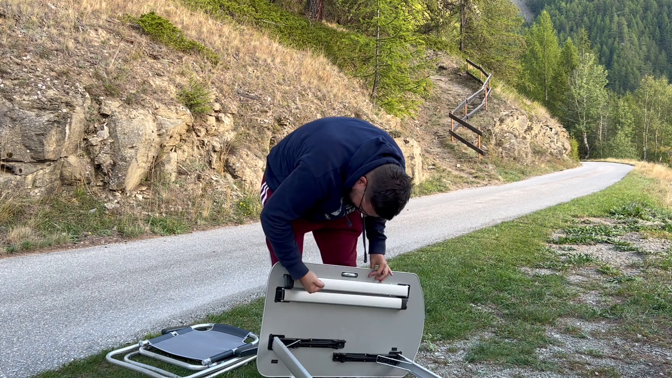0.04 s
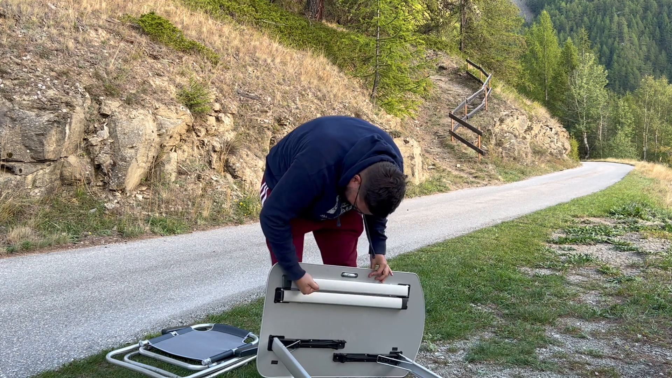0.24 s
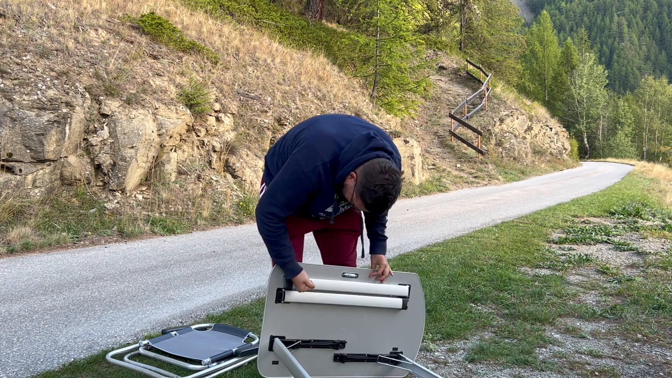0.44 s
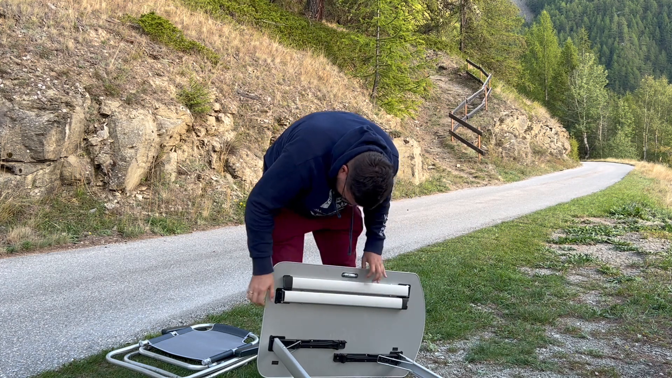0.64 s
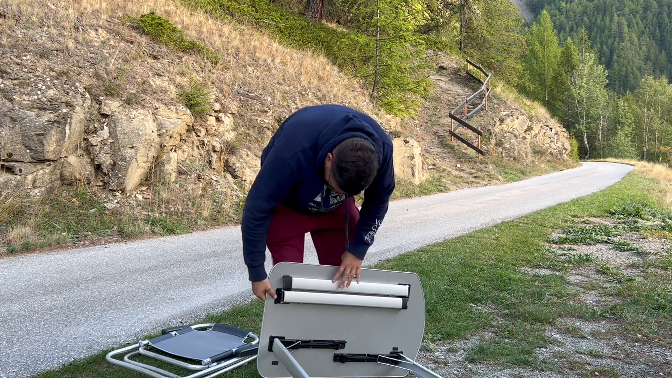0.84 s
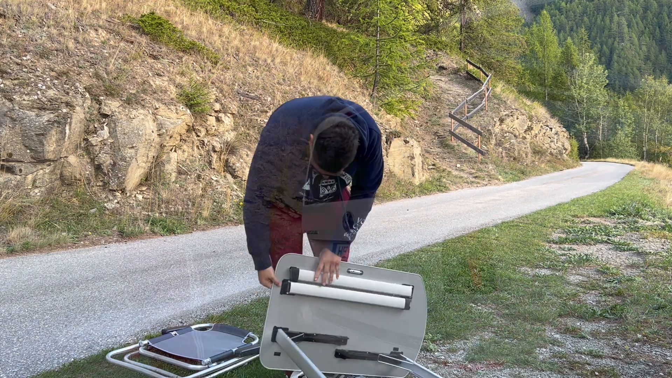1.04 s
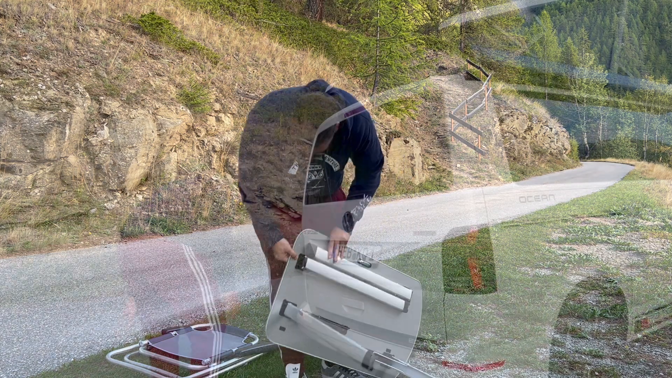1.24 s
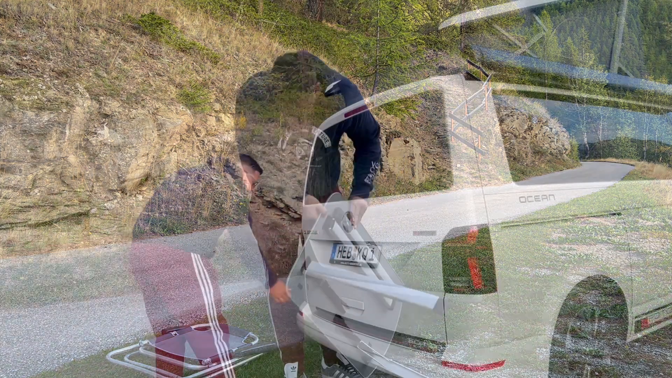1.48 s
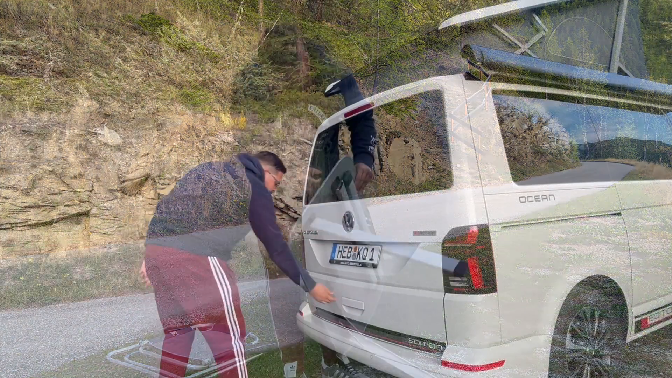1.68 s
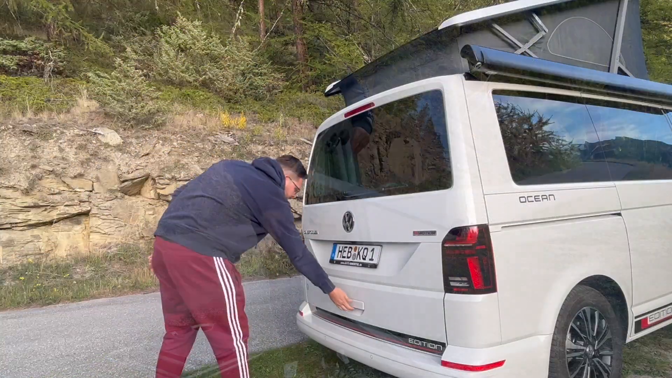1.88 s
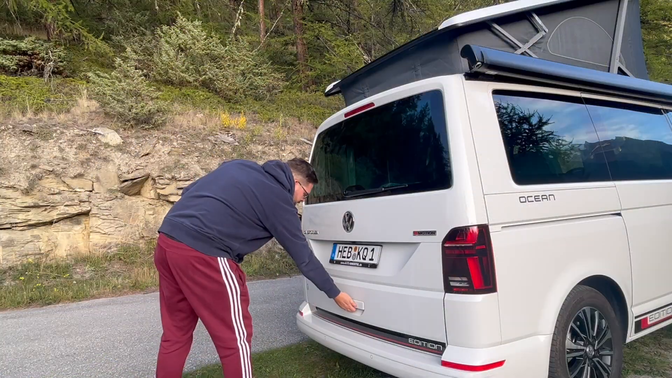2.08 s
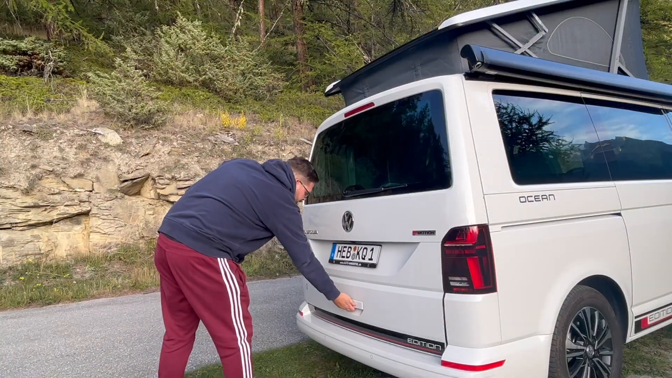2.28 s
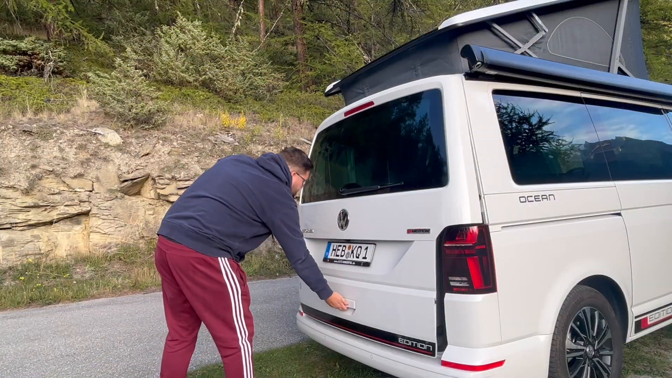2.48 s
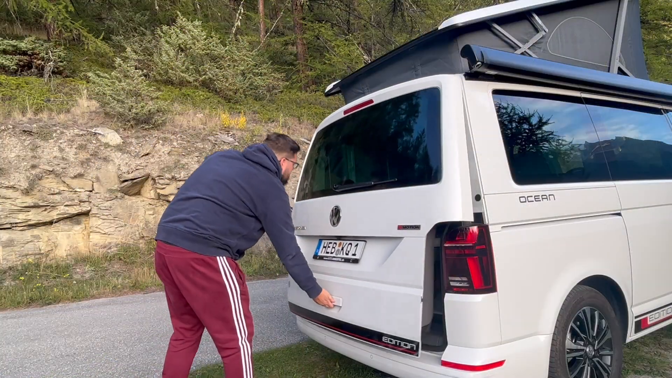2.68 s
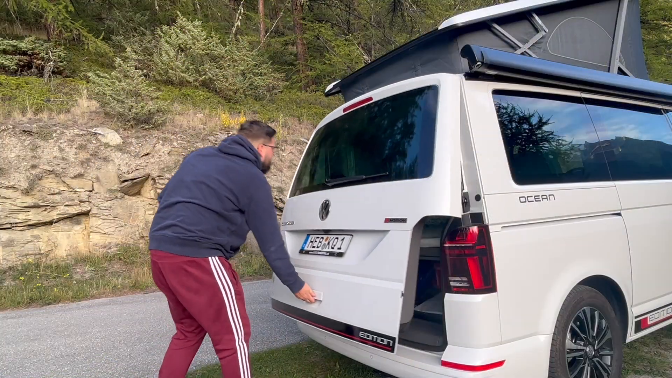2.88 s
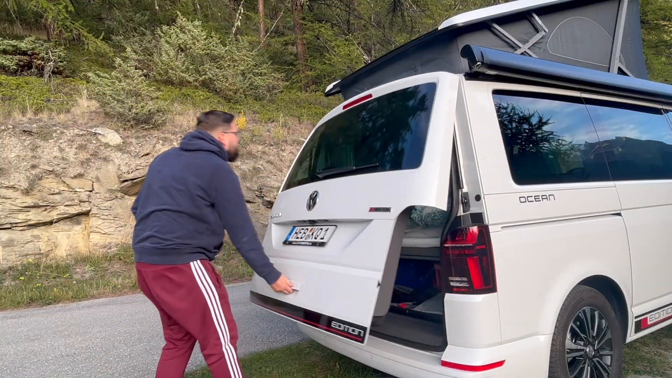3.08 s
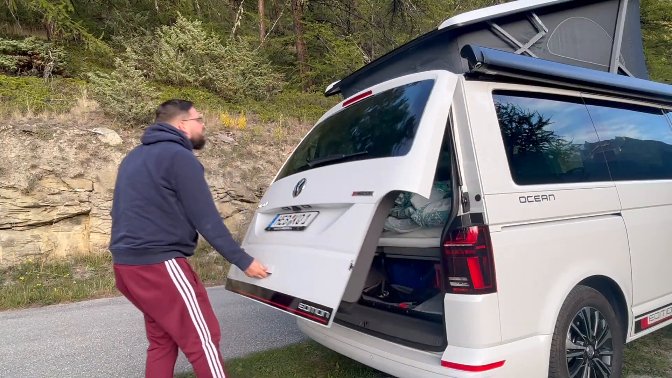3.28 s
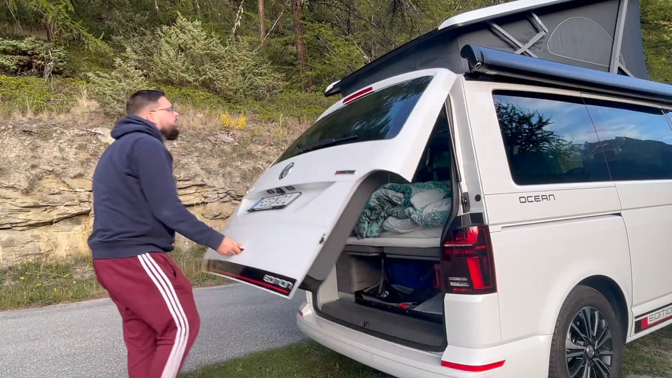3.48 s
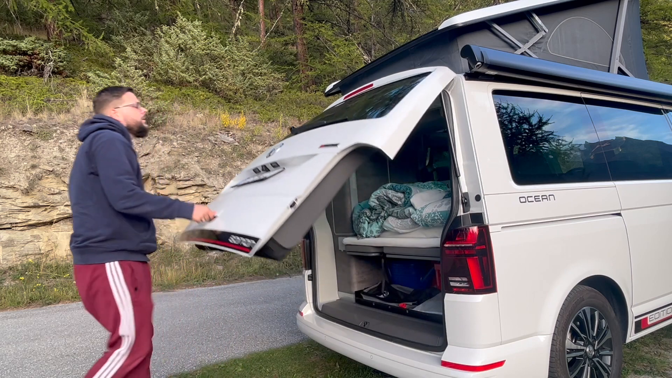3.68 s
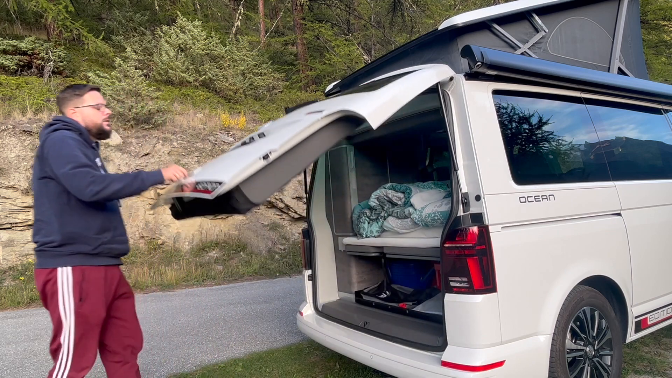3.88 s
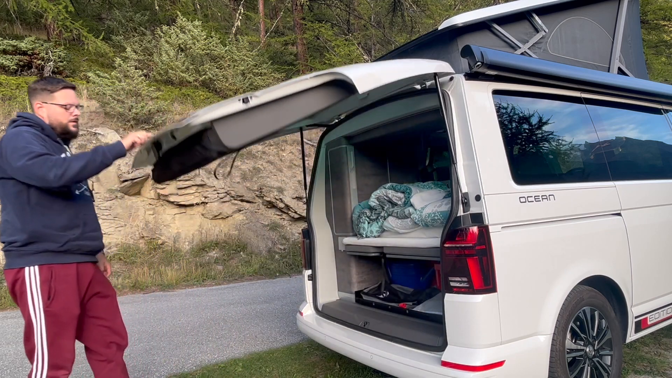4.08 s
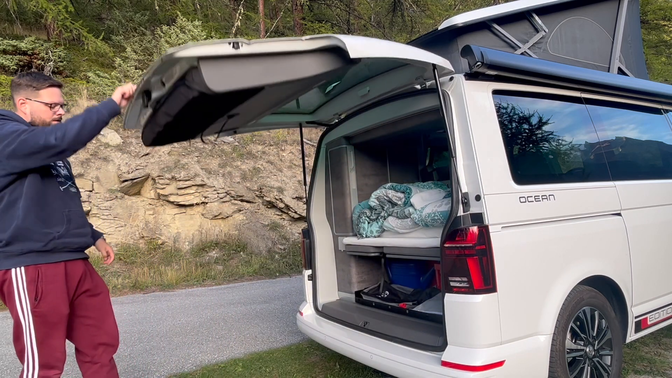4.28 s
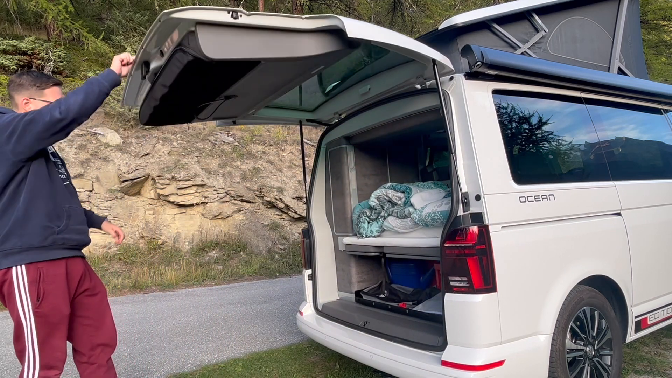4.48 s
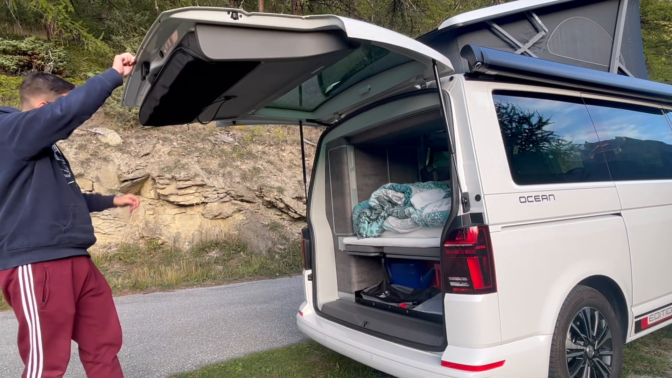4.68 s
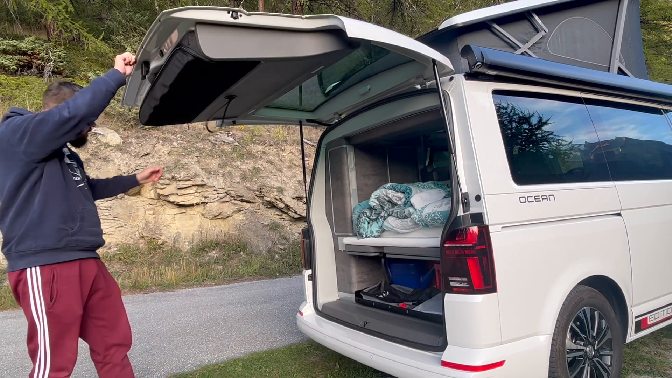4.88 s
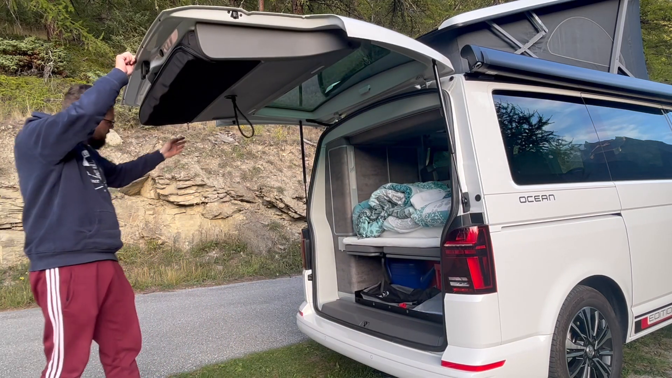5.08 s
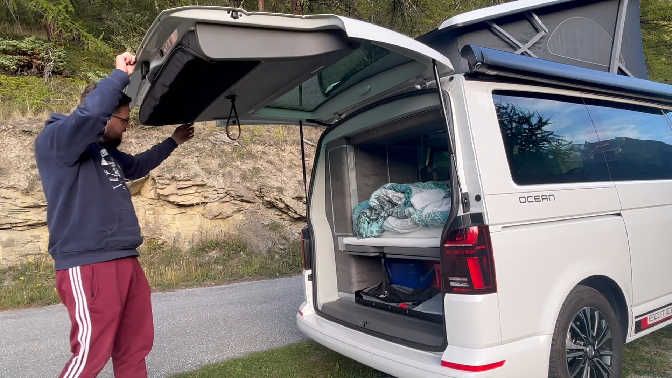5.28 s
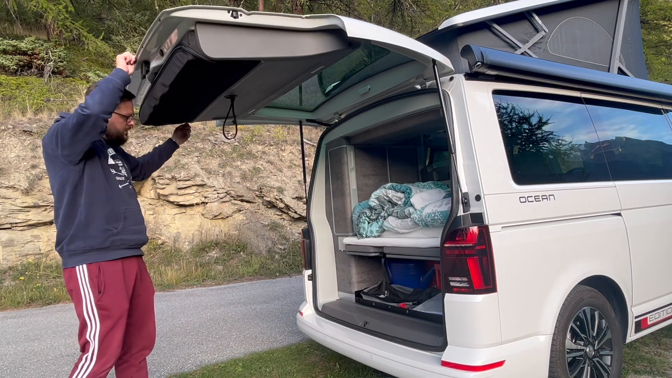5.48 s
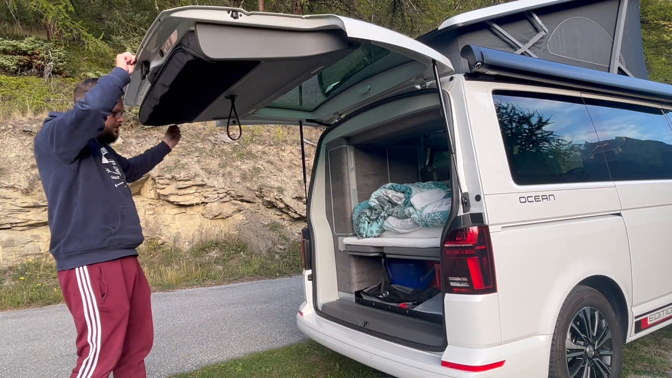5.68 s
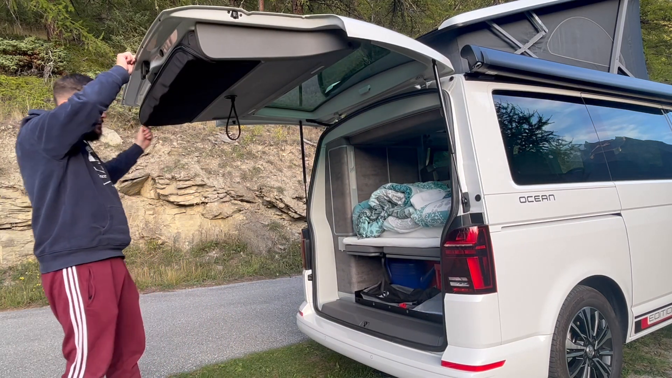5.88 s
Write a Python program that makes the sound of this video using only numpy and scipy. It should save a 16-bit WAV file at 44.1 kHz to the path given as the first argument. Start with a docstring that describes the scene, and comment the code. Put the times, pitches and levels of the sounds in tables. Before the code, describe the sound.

Close in stereo at a quiet roadside, a metal camping table clacks, loudest at a third of a second, then gives faint rattles and cloth rubs. A van's latch clunks and its small motor whirs and slows. Gas struts hiss softly as the gate rises, ending in a stronger puff and soft thuds. A drawer begins to roll with a rising gritty buzz. A distant bird whistles.

```python
"""Camping table and tailgate

At a quiet roadside a man snaps an aluminium table's legs shut and lifts it: blows ring modes, grains rub as cloth.
At a camper van something whirs faintly, then a geared latch motor strains, runs free and slows under load.
Gas struts hiss as filtered noise with sinking hollow bands, up to the stop, and airy whistles rise in it.
A drawer starts to roll out, a rising buzz over gritty rumble. A small bird slides its far whistles
down, over coloured noise for the open air."""
import sys
import numpy as np
from scipy import signal
from scipy.fft import rfft, irfft
from scipy.io import wavfile

SR = 44100
rng = np.random.default_rng(int(sys.argv[2]) if len(sys.argv) > 2 else 0)


def materialize(psi):
    """Save the field psi as 16-bit PCM at rate SR to the path in sys.argv[1].

    A 1-D psi becomes a single channel; in a 2-D psi each row is a channel.
    """
    bounded = np.clip(np.atleast_2d(psi).T, -1, 1)
    quanta = np.round(bounded * 32767).astype(np.int16)
    wavfile.write(sys.argv[1], SR, quanta)


N = 261954
TIME, FREQ = np.arange(N) / SR, np.fft.rfftfreq(N, 1 / SR)
BASS_EDGE_HZ, TREBLE_EDGE_HZ, FIZZ_EDGE_HZ = 300, 2500, 8400  # edges between the bands that get own levels


def table():
    """Legs snap into their clips and rattle as the table is lifted, ringing the top and the leg tubes."""
    # blows: (time [s], thump [dB], knock [dB], click [dB], ring time [factor])
    table_hits = [(.001, -30.5, -32, -42, 0.72), (.015, -49, -39, -40, 1), (.034, -37, -38, -45, 0.76),
                  (.099, -69, -56.5, -58, 0.57), (.335, -61, -47, -44, 0.86),
                  (.3402, -50, -22.5, -39, 0.68), (.3425, -23, -18, -28, 0.83),
                  (.373, -44, -42, -49.5, 0.99), (.396, -44, -41.5, -48.5, 0.46),
                  (.451, -57, -55, -64, 0.75), (.491, -44.5, -46.5, -50, 1.03),
                  (.986, -63, -61.5, -71.5, 1.27), (1.153, -56.5, -54, -82, 1.2),
                  (1.176, -56, -56, -70, 1.1), (1.269, -58, -49, -54.5, 0.69),
                  (1.276, -46.5, -51.5, -58.5, 1.0), (1.369, -43, -44, -59.5, 0.78),
                  (1.529, -68, -60, -67.5, 0.83), (1.621, -51.5, -47.5, -72, 0.8),
                  (1.712, -64, -58.5, -67.5, 1.05)]
    # modes of top and leg tubes: (frequency [Hz], relative level [dB], t60 at ring factor 1 [s])
    table_modes = [(104, -11, 0.31), (162.3, -1, .1), (201.4, -1, 0.15), (264, -12, .2), (402.6, -3, 0.11),
                   (440, -1, 0.064), (523, -6, 0.13), (700, -3.5, .1), (878, 0.5, 0.075), (985, 2.5, .05),
                   (1027, 1.5, 0.09), (1054, -29, 1), (1188.3, -3, .08), (1508, -1, 0.088),
                   (1896, -4.5, 0.05), (2240, -10, .07), (2440, -3, 0.031), (2935, -16.5, .1),
                   (4725, -12, .05)]
    # dense, short-lived modes: (frequency [Hz], relative density [dB per Hz])
    table_colour = [(40, -24.5), (170, -2.5), (320, -12), (620, -11), (950, 0), (1600, -10.5),
                    (2500, -11.5), (4800, -14.5), (7000, -19.5), (16000, -30.5)]
    # decay of the dense modes: (frequency [Hz], t60 at ring factor 1 [s])
    table_t60 = [(100, 0.28), (400, 0.23), (1200, 0.11), (4000, 0.049), (14000, 0.088)]
    x = blows(table_hits, table_modes, table_colour, table_t60,
              dense_db=-4.0, build_cycles=0.69, scatter_db=2.5, soft_s=0.00053)
    echoes = surroundings(split(x, hz=1000)[1])
    return wide(x, side_db=-14.5, above_hz=600) + amp(-22.0) * echoes


def tailgate():
    """The latch lets go, the gate meets its stop and hands knock about the boot; light taps are mixed in."""
    # blows: (time [s], thump [dB], knock [dB], click [dB], ring time [factor])
    van_hits = [(2.239, -67, -64, -62, 0.56), (2.389, -39, -46, -50.5, 0.6),
                (2.393, -36.5, -36, -44.5, 0.47), (2.41, -46, -48.5, -55, 0.82),
                (2.456, -51.5, -63, -64, 1.1), (2.513, -57, -53, -68.5, 0.54),
                (2.563, -78.5, -59.5, -64.5, 1.14), (2.713, -55.5, -56, -92, 0.71),
                (2.842, -62, -62, -73.5, 0.74), (4.578, -50, -49, -55.5, 1.22),
                (4.682, -45, -53.5, -68, 0.87), (4.812, -55.5, -64.5, -71.5, 1.48),
                (5.496, -63, -59.5, -71, 0.45)]
    # panel modes: (frequency [Hz], relative level [dB], t60 at ring factor 1 [s])
    van_modes = [(65.3, 8, 0.38), (92.4, 5.5, 0.39), (264.7, -10.5, 0.48), (321.4, -4, 0.29),
                 (426, -6.5, 0.11), (620, 2, 0.28), (973, -4, 0.099), (1813, -1.5, 0.029)]
    # dense panel modes: (frequency [Hz], relative density [dB per Hz])
    van_colour = [(35, 2), (90, 17), (300, 4.5), (800, 10), (1500, -0.5), (2800, -21), (3500, -23),
                  (5500, -35), (7000, -43), (15000, -56)]
    # decay of the dense modes: (frequency [Hz], t60 at ring factor 1 [s])
    van_t60 = [(100, 0.28), (400, 0.31), (1200, 0.14), (4000, 0.11), (14000, 0.2)]
    x = blows(van_hits, van_modes, van_colour, van_t60,
              dense_db=0.5, build_cycles=0.58, scatter_db=13.5, soft_s=0.00071)
    x = x + taps()
    return ports(x) + amp(-16.5) * surroundings(split(x, hz=206)[1])


def blows(rows, modes, colour, t60, dense_db, build_cycles, scatter_db, soft_s):
    """Each blow rings the body's modes and a dense cloud of short ones; low modes take longer to build."""
    t, out = np.arange(3 * 2 ** 13) / SR, np.zeros(N)
    hz, db, life = np.transpose(modes)[:, :, None]
    f = np.fft.rfftfreq(len(t), 1 / SR)
    # the cloud is made in 12 overlapping bands, so each can build and die at its own speed
    centres = np.geomspace(50, 16000, 12)[:, None]
    overlaps = [np.interp(np.log(f + 1), np.log(centres[:, 0]), k) for k in np.eye(len(centres))]
    bands = np.array(overlaps) * amp(read(colour, f))
    # moments over which the strength of thump, knock and click holds
    spans_s = ((.003, .033), (0, .02), (0, .012))
    windows = [slice(round(a * SR), round(b * SR)) for a, b in spans_s]
    for s, *levels_db, ring in rows:
        place = rng.uniform(-1, 1, hz.shape)  # every blow excites the modes unequally
        mode_db = db + scatter_db * place - 60 * t / (life * ring)
        swing = np.sin(2 * np.pi * hz * t) * amp(mode_db)
        tones = (swing * (1 - np.exp(-t * hz / build_cycles))).sum(0)
        cloud = shaped(rng.standard_normal(len(t)), bands)
        cloud = cloud * amp(-60 * t / (read(t60, centres) * ring))
        cloud = (cloud * (1 - np.exp(-t * centres / build_cycles))).sum(0)
        press = 1 - np.exp(-t / (soft_s * ring ** 4))  # long blows are soft pushes that start slowly
        body = press * (evened(tones) + amp(dense_db) * evened(cloud))
        bass, rest = split(body, BASS_EDGE_HZ)
        for part, level_db, window in zip([bass, *split(rest, TREBLE_EDGE_HZ)], levels_db, windows):
            add(out, s, amp(level_db) * part / part[window].std())
    return out


def taps():
    """Small bumps, scuffs and ticks: one resonance and a brief scuff of noise centred on it."""
    # contacts: (time [s], resonance [Hz], level [dB], t60 [s])
    contacts = [(1.275, 1060, -35.5, 0.073), (1.371, 823, -38.5, 0.064), (1.593, 3740, -42, 0.09),
                (4.223, 299.3, -43.5, 0.2), (4.47, 64.8, -42.5, 0.24), (4.703, 93.3, -44, 0.3),
                (4.967, 1446, -52, 0.04), (5.337, 3674, -62, 0.083), (5.498, 263.5, -44, 0.078),
                (5.859, 1172, -44, 0.47)]
    t, out = np.arange(2 ** 13) / SR, np.zeros(N)
    f = np.fft.rfftfreq(len(t), 1 / SR)
    for s, hz, db, t60 in contacts:
        fade = amp(-60 * t / t60) * (1 - np.exp(-t * hz))
        peak = (2 * f * hz / (f ** 2 + hz ** 2)) ** (2 + hz / 150)
        scuff = evened(shaped(rng.standard_normal(len(t)), peak))
        tone = np.sin(2 * np.pi * hz * t) / (1 + (hz / 2000) ** 2)  # high ticks are scuff more than ring
        add(out, s, amp(db) * fade * (tone + .5 * scuff))
    return out


def rustle():
    """Cloth and hands slide over the table and the van in uneven strokes of friction noise."""
    # strokes: (start [s], length [s], body [dB], hiss [dB], fizz [dB])
    strokes = [(0, 0.02, -27.5, -53, -66), (0.109, 0.11, -60.5, -78.5, -82),
               (0.468, 0.084, -56.5, -79, -85), (0.98, 0.22, -67.5, -82, -72), (1.198, 0.15, -59, -71, -72),
               (1.395, 0.2, -62, -80, -82), (1.579, 0.04, -49, -59.5, -67.5), (1.668, 0.085, -61, -84, -98),
               (4.799, 0.037, -59, -81.5, -85.5), (5.16, 0.13, -72, -91, -85),
               (5.51, 0.033, -68, -76.5, -73)]
    # cloth spectrum: (frequency [Hz], relative density [dB per Hz])
    rustle_colour = [(100, -4.5), (260, 0), (700, -7.5), (1400, -10), (2300, -21.5), (4000, -17.5),
                     (6000, -17), (8500, -22.5), (13000, -17), (15500, -22.5)]
    attack_s, release_s = 0.025, 0.028
    body, treble = friction(rustle_colour, per_s=1200, spread_db=2.0, smooth=0.42)
    hiss, fizz = map(evened, split(treble, FIZZ_EDGE_HZ))
    rub = 0
    for s, length, body_db, hiss_db, fizz_db in strokes:
        cloth = amp(body_db) * body + amp(hiss_db) * hiss + amp(fizz_db) * fizz
        # half of each attack lies ahead of the stroke's start
        rub = rub + envelope(s - attack_s / 2, length, attack_s, release_s) * cloth
    uneven = patchy(rub, depth_db=4, width_hz=150, life_s=0.018)
    return uneven * amp(2 * wander(hz=49.95))


def whirr():
    """A soft, grainy whirr at the van before the latch moves: friction in fixed bands that stops short."""
    # whirr spectrum: (frequency [Hz], relative density [dB per Hz])
    whirr_colour = [(100, 0), (300, 8.5), (800, -10.5), (1250, -9), (1520, 2.5), (1850, -12.5),
                    (2600, -10.5), (3200, -24.5), (5200, -25), (5850, -9), (6800, -16.5), (9000, -33)]
    start_s, length_s, level_db = 1.65, 0.325, -62.5
    low, high = friction(whirr_colour, per_s=750, spread_db=0.0, smooth=0.41)
    level = envelope(start_s, length_s, attack_s=0.087, release_s=0.022) * amp(level_db)
    return level * (low + amp(-11.0) * high)


def latch_motor():
    """A geared motor strains at the catch, runs free, then slows under load; it whines when it works hard."""
    # gear spectrum: (frequency [Hz], relative density [dB per Hz])
    latch_colour = [(100, 1.5), (700, 4), (1150, -5), (1750, -2.5), (2400, -13), (3100, -15.5), (4700, -27),
                    (7000, -50)]
    start_s, catch_release_s, load_s, stop_s = 2.315, 2.37, 2.715, 2.837
    free_hz, loaded_hz, sag_s = 1720, 1364, 0.0292
    free_db, extra_strain_db, strain_s, extra_load_db = -61, 8, 0.032, -6
    whine_db, rasp_db = -3, -14  # against the gear noise, before load and strain weigh them
    load = .5 + .5 * np.tanh((TIME - load_s) / sag_s)
    strain = np.exp(-((TIME - catch_release_s) / strain_s) ** 2)
    hz = free_hz + (loaded_hz - free_hz) * (load + .5 * strain)
    turns = np.cumsum(hz * (1 + 0.012 * wander(hz=119.3))) / SR
    whine = amp(whine_db) * (load + strain) * np.sin(2 * np.pi * turns)
    gears, rasp = friction(latch_colour, per_s=300, spread_db=3, smooth=1.1)
    gears = evened(gears + .5 * echo(gears, hz / 2))
    gears = patchy(gears, depth_db=3.5, width_hz=29, life_s=0.03)
    rasp = amp(rasp_db) * (.3 + strain) * rasp
    running = envelope(start_s, stop_s - start_s, attack_s=0.0093, release_s=0.041)
    level = amp(free_db + extra_strain_db * strain + extra_load_db * load)
    return running * level * (gears + whine + rasp)


def struts():
    """Gas squeezes past the pistons, brighter as it speeds up; the rising gate gives sinking hollow bands."""
    # strut spectrum: (frequency [Hz], relative density [dB per Hz])
    strut_colour = [(100, -14), (300, 3.5), (750, 3), (1200, -3.5), (1800, -13), (2800, -16.5), (5100, -8),
                    (6300, -14), (8000, -14), (9600, -6), (11000, -6), (15500, -11.5)]
    # rows are rush, hiss and fizz: (full level [dB], rise time [s], extra level in the damper [dB])
    gas_bands = [(-65.5, 0.046, 13.5), (-68, 0.62, 9.5), (-56, 1, 1)]
    lift_start_s, damper_s, lift_stop_s = 3.03, 4.53, 4.68
    shut_hz, open_hz = 900, 539.6  # spacing of the resonances under the gate
    rush_growth_db = 7.5  # over the whole travel
    lift_s = lift_stop_s - lift_start_s
    travel = .5 - .5 * np.cos(np.pi * np.clip((TIME - lift_start_s) / lift_s, 0, 1))
    hollow_hz = shut_hz + (open_hz - shut_hz) * travel
    rush, treble = split(diffuse(strut_colour), TREBLE_EDGE_HZ)
    rush = patchy(rush, depth_db=3, width_hz=22, life_s=0.029)
    treble = patchy(treble, depth_db=4.5, width_hz=34, life_s=0.03)
    hiss, fizz = split(treble, FIZZ_EDGE_HZ)
    rush = evened(rush + 0.24 * echo(rush, hollow_hz)) * amp(rush_growth_db * (travel - .5))
    fizz = evened(fizz) * amp([[-1], [1]])  # stronger on the right
    damper = envelope(damper_s, 0.042, attack_s=0.017, release_s=0.2)
    gas = 0
    for band, (db, rise_s, damper_db) in zip([rush, evened(hiss), fizz], gas_bands):
        # squaring makes the rise start gently and the release twice as fast
        flow = envelope(lift_start_s, lift_s, rise_s, release_s=0.024) ** 2
        gas = gas + band * amp(db + damper_db * damper) * flow
    return gas


def strut_whistles():
    """The escaping gas catches in short, airy whistles that rise and break off: narrow noise on a glide."""
    # whistles: (start [s], length [s], first pitch [Hz], level [dB])
    whistles = [(3.68, .2, 4750, -73.5), (3.858, 0.22, 1855, -70), (3.933, 0.27, 4250, -71.5),
                (4.258, .16, 4950, -71)]
    rise_hz_per_s, blur = 3500, 0.053  # blur is a share of the first pitch
    out = np.zeros(N)
    for s, length, first_hz, db in whistles:
        t = np.arange(round(length * SR)) / SR
        turn = 2 * np.pi * np.cumsum(first_hz + rise_hz_per_s * t) / SR
        a, b = (wander(blur * first_hz)[:len(t)] for _ in range(2))
        airy = evened(a * np.cos(turn) + b * np.sin(turn))
        add(out, s, amp(db) * np.sin(np.pi * t / length) * airy)
    return ports(out)


def drawer():
    """Rollers gather speed in their rails: a rough rising buzz and gritty rumble, coloured by the drawer."""
    # drawer spectrum: (frequency [Hz], relative density [dB per Hz])
    drawer_colour = [(60, -7.5), (245, 11), (370, -4), (490, 6), (1400, 1), (2500, -13), (4100, -13),
                     (6000, -15.5), (8000, -21.5), (15500, -28)]
    # levels over time: (time [s], bass [dB], middle [dB], treble [dB])
    drawer_levels = [(5.7, -64.5, -63, -62.5), (5.74, -52.5, -55, -59), (5.815, -60, -53, -58),
                     (5.84, -44, -51.5, -54.5), (5.875, -59, -54, -49.5), (5.94, -56, -55, -50.5)]
    start_s, start_hz, rise_hz_per_s = 5.698, 137.3, 990  # a pull with steady acceleration
    buzz_db = 6.5  # against the rumble, before the speed weighs both
    hz = start_hz + rise_hz_per_s * np.maximum(TIME - start_s, 0)
    speed = hz / hz[-1]
    s, *levels_db = np.transpose(drawer_levels)
    bass_gain, mid_gain, treble_gain = (amp(np.interp(TIME, s, db)) for db in levels_db)
    low, hiss = friction(drawer_colour, per_s=8300, spread_db=9.5, smooth=1.0)
    # the rough rollers repeat their rumble on every turn
    bass, rumble = map(evened, split(low + 0.67 * echo(low, hz), BASS_EDGE_HZ))
    hiss = patchy(hiss + .5 * echo(hiss, hz), depth_db=2.0, width_hz=99, life_s=0.02)
    hiss = evened(hiss) * amp([[1], [-1]])  # stronger on the left
    turns = np.cumsum(hz * (1 + 0.006 * wander(hz=120))) / SR
    orders = np.arange(1, 15)[:, None]  # harmonics of the turning rate
    weights = np.array([amp(read(drawer_colour, k * hz) + 2.8 * wander(hz=40)) for k in orders])
    harmonics = np.sin(2 * np.pi * (orders * turns + rng.random(orders.shape)))
    buzz = evened((weights * harmonics).sum(0) / np.linalg.norm(weights, axis=0))
    middle = rumble * (1 - .5 * speed) + amp(buzz_db) * speed * buzz
    rolling = bass_gain * bass + mid_gain * middle + treble_gain * hiss
    return np.clip((TIME - start_s) / 0.0022, 0, 1) * rolling


def bird():
    """Thin whistles: sine tones that slide down and level out with a slight waver, blurred by the trees."""
    # whistles: (start [s], length [s], first pitch [Hz], last pitch [Hz], direct level [dB])
    calls = [(2.04, 0.29, 8200, 6605, -89), (2.62, 0.29, 8300, 6580, -81.5), (3.02, 0.34, 6520, 6350, -88),
             (3.26, 0.27, 8320, 6650, -77)]
    song = np.zeros(N)
    for s, length, first_hz, last_hz, db in calls:
        u = np.linspace(0, 1, round(length * SR))
        waver_hz = 110 * wander(hz=148.8)[:len(u)]
        hz = last_hz + (first_hz - last_hz) * (1 - u) ** 2 + waver_hz
        swell = np.sin(np.pi * u ** 1.25)
        add(song, s, amp(db) * swell * np.sin(2 * np.pi * np.cumsum(hz) / SR))
    return song + amp(4.0) * surroundings(song)


def air():
    """Low, gently swelling outdoor noise; its level dips briefly and returns slightly lower."""
    # air spectrum: (frequency [Hz], relative density [dB per Hz])
    air_colour = [(20, -27), (70, 4.5), (150, -7), (500, -13), (1000, -15.5), (3200, -36.5), (7500, -41.5),
                  (15000, -48)]
    before_db, after_db = -65, -67
    dip_start_s, dip_length_s, dip_db = 2.06, 0.12, -9
    dip = envelope(dip_start_s, dip_length_s, attack_s=0.026, release_s=0.038)
    level_db = np.where(TIME < dip_start_s, before_db, after_db) + dip_db * dip
    return evened(diffuse(air_colour)) * amp(level_db + 0.71 * wander(hz=9.8))


def surroundings(x, build_s=0.0077):
    """Scattered echoes from the rock face and the van: a noise tail, each band dying at its own speed."""
    # echo decay: (frequency [Hz], t60 [s])
    tail_t60 = [(80, 0.64), (500, 0.55), (2000, 0.32), (3200, 0.36), (6000, 0.27), (14000, 0.19)]
    hz, t, z = signal.stft(rng.standard_normal((2, SR)), SR, nperseg=256)
    decay = amp(-60 * t / read(tail_t60, hz)[:, None])
    build = 1 - np.exp(-t / build_s)
    tail = signal.istft(z * decay * build, SR, nperseg=256)[1]
    tail = tail + 0.24 * tail[::-1]  # the channels share some of each other's echoes
    return signal.fftconvolve(x[None], tail / np.linalg.norm(tail[0]), axes=1)[:, :N]


def friction(colour, per_s, spread_db, smooth):
    """Tiny slips of uneven size over a smooth rub, as a low and a high part."""
    struck = rng.random(N) < per_s / SR
    sizes = amp(spread_db * np.minimum(rng.exponential(1, N), 4))
    slips = struck * rng.choice([-1, 1], N) * sizes
    near = evened(ports(shaped(slips, amp(read(colour, FREQ)))))
    rub = near + smooth * evened(diffuse(colour))
    return [evened(part) for part in split(rub, TREBLE_EDGE_HZ)]


def patchy(x, depth_db, width_hz, life_s):
    """Narrow bands swell and fade on their own as the contact shifts."""
    hz, t, z = signal.stft(x, SR, nperseg=1024)
    field = rng.standard_normal(z.shape[1:])
    # smooth the random gains along frequency, then along time
    for axis, reach in enumerate([width_hz / hz[1], life_s / t[1]]):
        bell = signal.windows.gaussian(61, max(reach, .3))
        field = signal.fftconvolve(field, np.expand_dims(bell, 1 - axis), "same")
    gain = evened(amp(depth_db * evened(field)))
    return signal.istft(z * gain, SR, nperseg=1024)[1][:, :N]


def echo(x, spacing_hz):
    """A copy late by one period of spacing_hz; added to x it gives resonances at that spacing."""
    return np.array([np.interp(TIME - 1 / spacing_hz, TIME, side) for side in x])


def ports(x):
    """A near source reaches the two microphone ports with a phase gap that grows in the treble."""
    # phase gap: (frequency [Hz], lead of the left channel [radians])
    port_phase = [(90, 0), (550, -.45), (1100, .4), (1500, -.45), (3100, .6), (7000, -.3), (8700, -1.1),
                  (9900, -3.1), (11100, -5.2), (12400, -6.2), (14500, -6.6), (15800, -8.4)]
    return shaped(x, np.exp(.5j * read(port_phase, FREQ) * np.array([[1], [-1]])))


def wide(x, side_db, above_hz):
    """A large panel reaches the two ports by slightly different paths: a scattered side signal."""
    paths = rng.standard_normal(300)
    side = signal.oaconvolve(split(x, above_hz)[1], paths / np.linalg.norm(paths))[:N]
    return ports(x) + amp(side_db) * np.array([side, -side])


def diffuse(colour):
    """Coloured noise, alike in both channels in the bass and nearly unrelated in the treble."""
    # stereo correlation: (frequency [Hz], likeness [0 to 1])
    likeness = [(60, 1), (250, 0.39), (1500, 0.11), (8000, 0.067)]
    a, b = rng.standard_normal((2, N))
    same = np.clip(read(likeness, FREQ), -1, 1)
    other = shaped(a, same) + shaped(b, np.sqrt(1 - same ** 2))
    return shaped(np.array([a, other]), amp(read(colour, FREQ)))


def wander(hz):
    """Slow random drift of rms 1, fading out above a rate of about hz."""
    return evened(shaped(rng.standard_normal(N), np.exp(-(FREQ / hz) ** 2)))


def envelope(start, length, attack_s, release_s):
    """Straight attack, hold until start + length, exponential release."""
    attack = np.clip((TIME - start) / attack_s, 0, 1)
    return attack * np.exp(-np.maximum(TIME - start - length, 0) / release_s)


def amp(db):
    """Decibels to gain."""
    return 10 ** (np.asarray(db) / 20)


def evened(x):
    """Scales to rms 1."""
    return x / np.sqrt(np.mean(x ** 2) + 1e-30)


def read(points, hz):
    """Reads a curve of (frequency, value) points on a log-frequency axis."""
    f, value = np.transpose(points)
    return np.interp(np.log(hz + 1), np.log(f + 1), value)


def add(mix, s, sound):
    """Mixes a sound in at time s."""
    part = mix[..., max(round(s * SR), 0):][..., :sound.shape[-1]]
    part += sound[..., :part.shape[-1]]


def shaped(x, gain):
    """Filters by a gain for every frequency."""
    return irfft(rfft(x) * gain, x.shape[-1])


def split(x, hz):
    """The parts below and above hz, by fourth-order Butterworth filters."""
    filters = [signal.butter(N=4, Wn=hz, btype=kind, fs=SR, output="sos") for kind in ("low", "high")]
    return [signal.sosfilt(sos, x) for sos in filters]


def scene():
    """All sources at the two microphone ports."""
    blows_and_rubs = table() + tailgate() + rustle()
    machinery = whirr() + latch_motor() + struts() + strut_whistles() + drawer()
    return blows_and_rubs + machinery + bird() + air()


def record(dry):
    """A low cut at 37 Hz and a steep treble limit at 15.7 kHz."""
    cut = split(dry, hz=37)[1]
    limit = signal.firwin(511, 15700, window=("kaiser", 9), fs=SR)
    return signal.oaconvolve(cut, limit[None], "same")


dry = scene()
out = record(dry)
materialize(out)
```